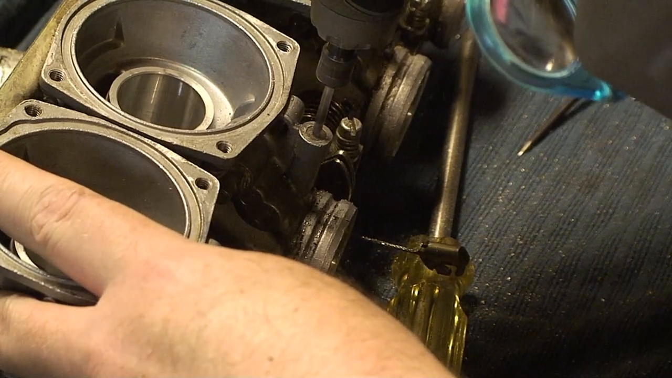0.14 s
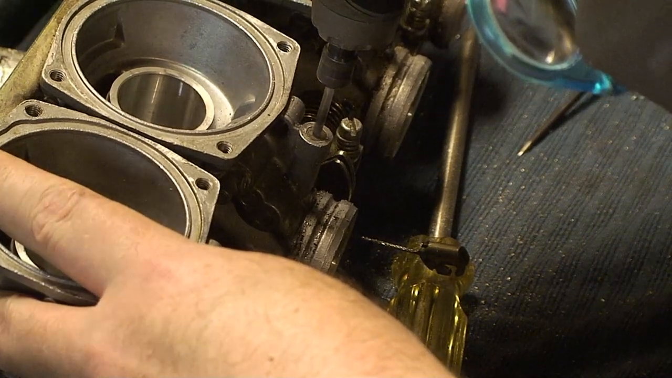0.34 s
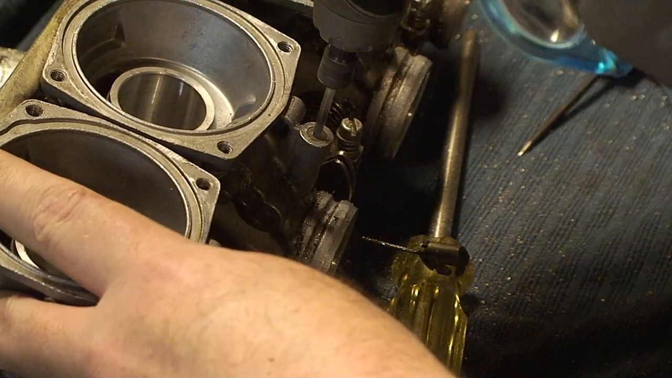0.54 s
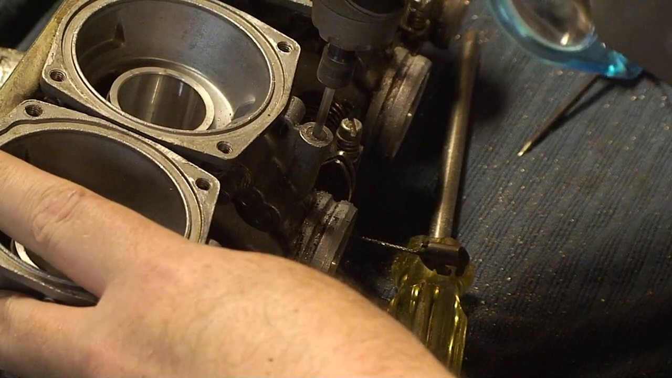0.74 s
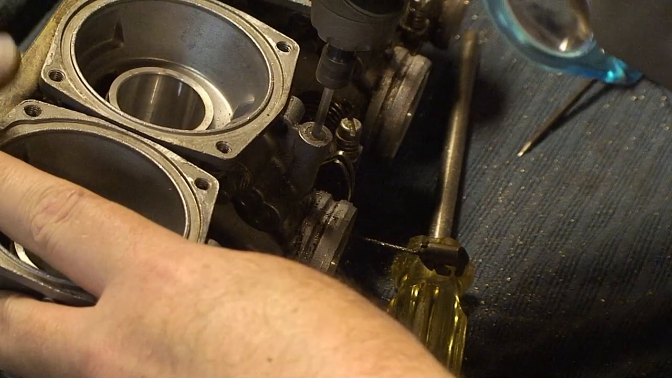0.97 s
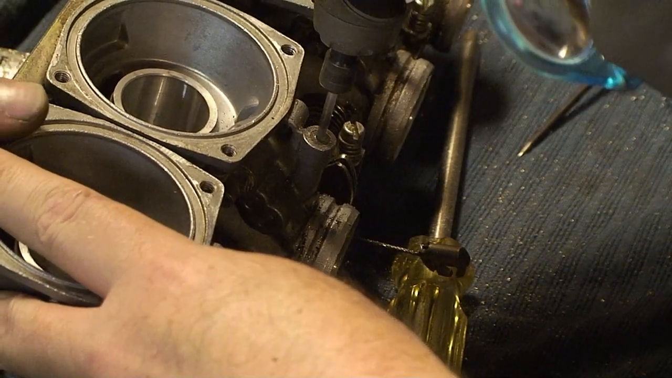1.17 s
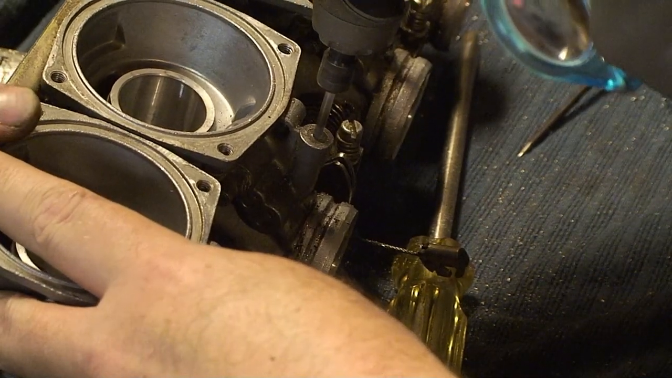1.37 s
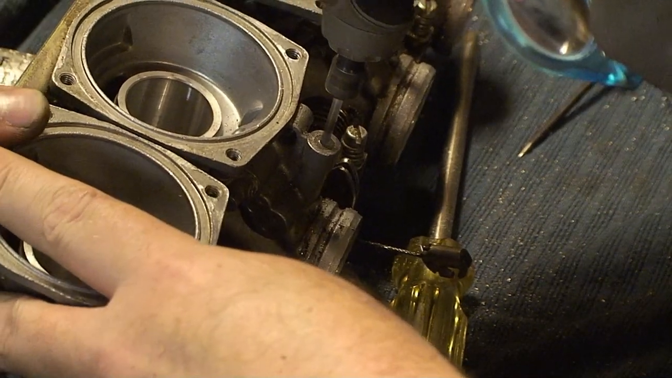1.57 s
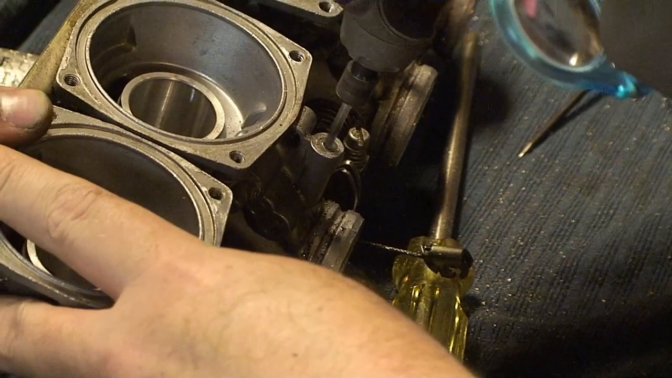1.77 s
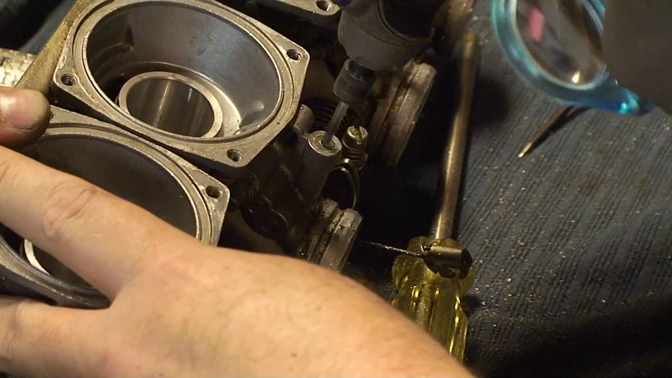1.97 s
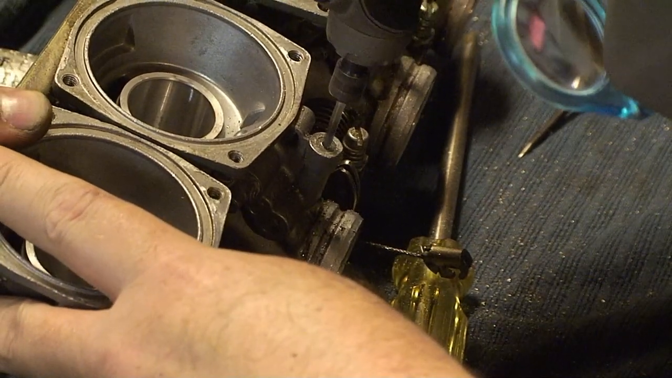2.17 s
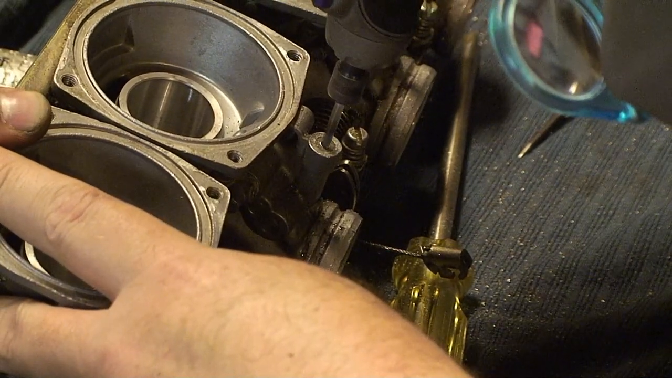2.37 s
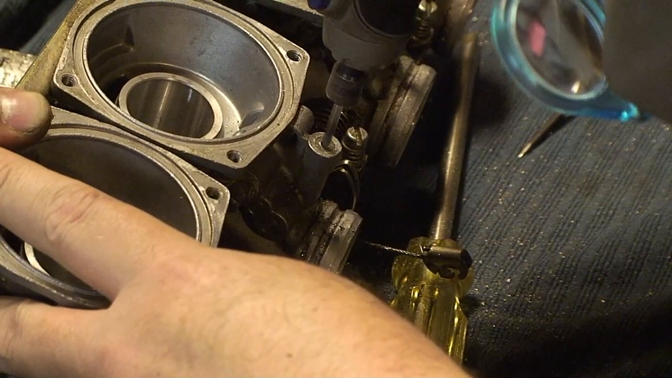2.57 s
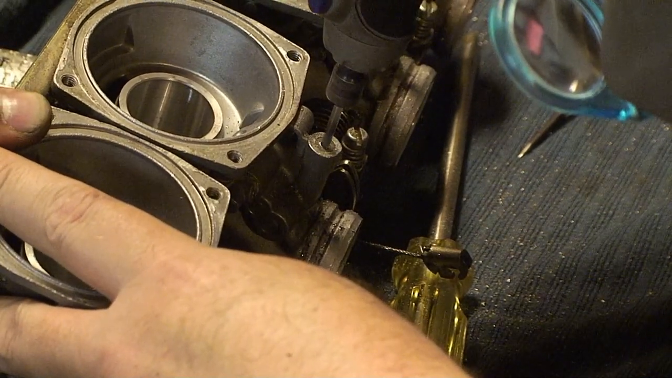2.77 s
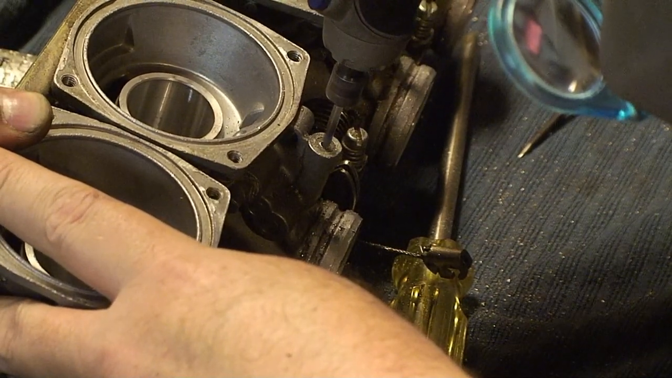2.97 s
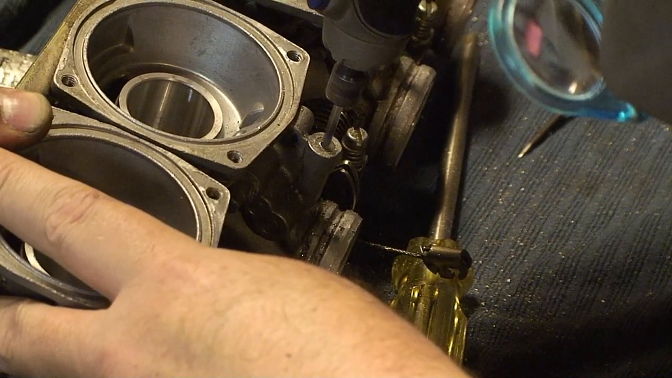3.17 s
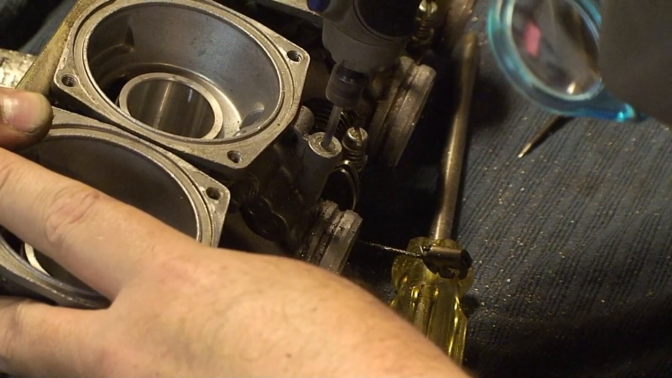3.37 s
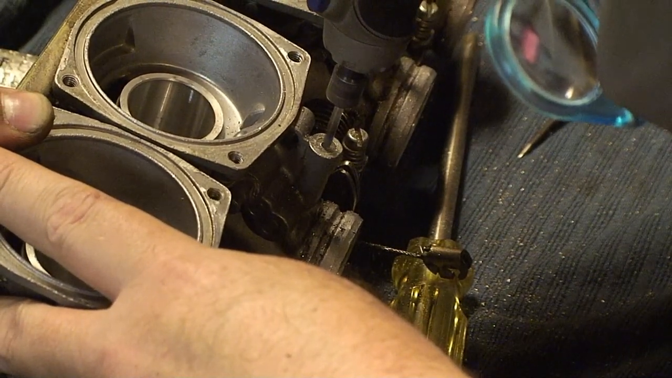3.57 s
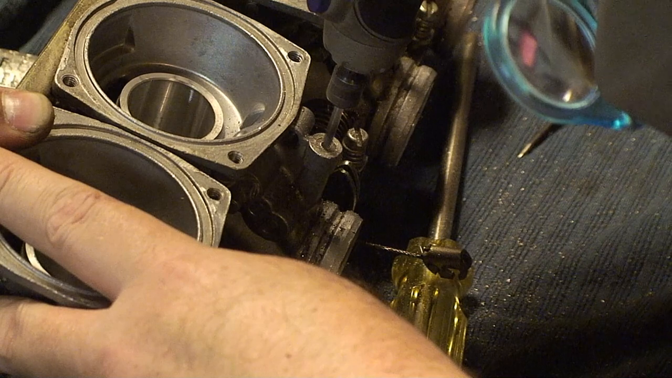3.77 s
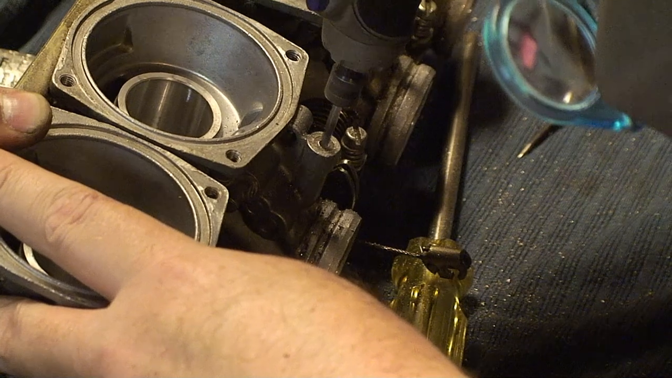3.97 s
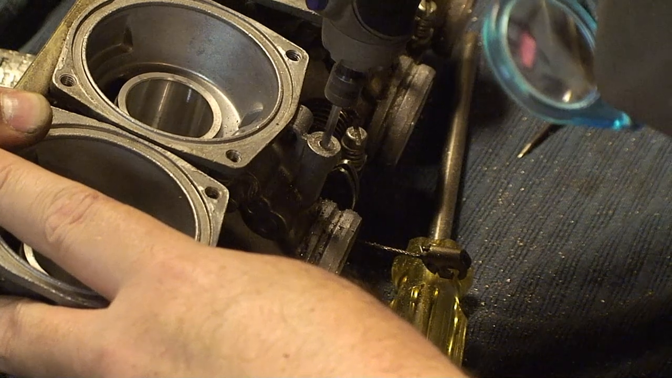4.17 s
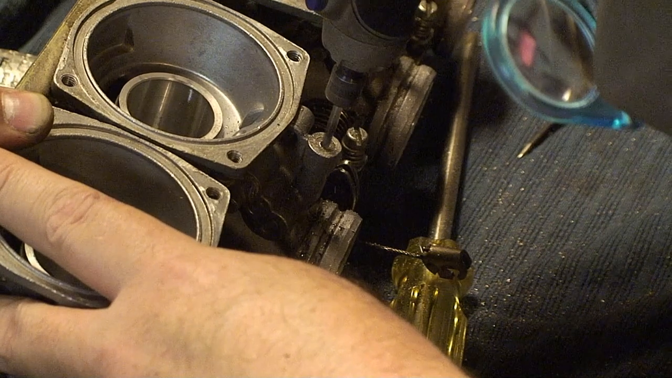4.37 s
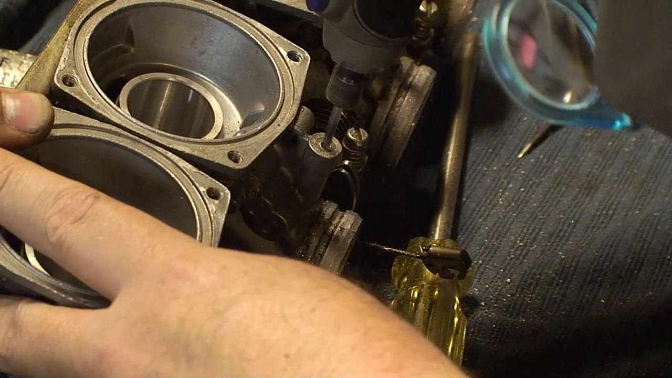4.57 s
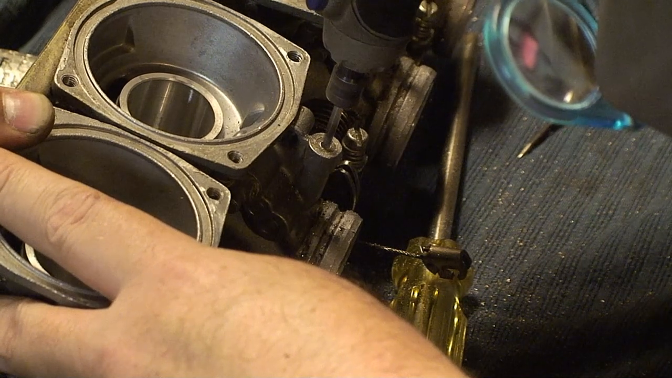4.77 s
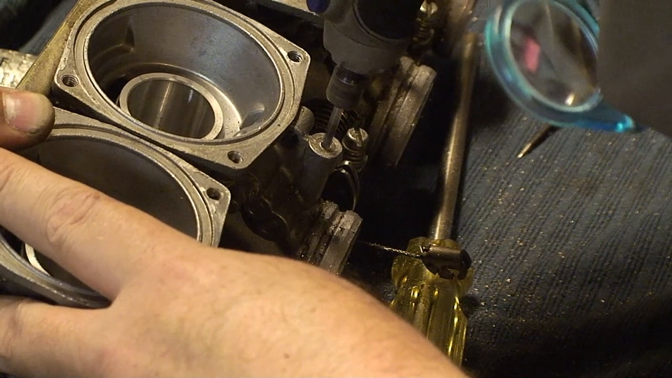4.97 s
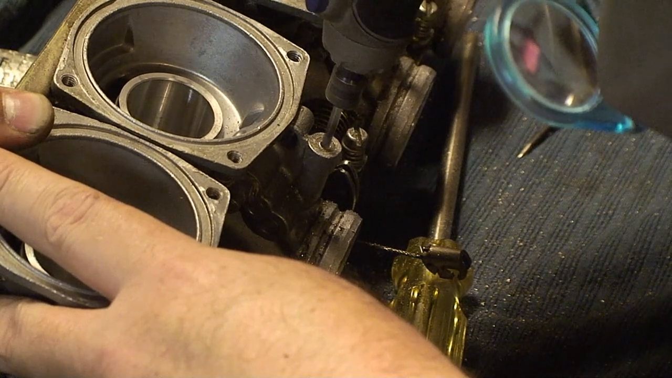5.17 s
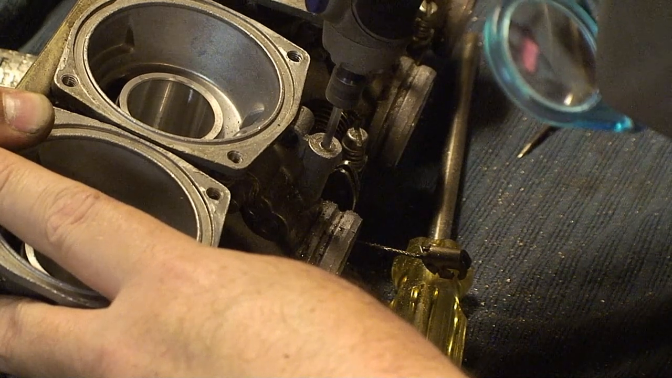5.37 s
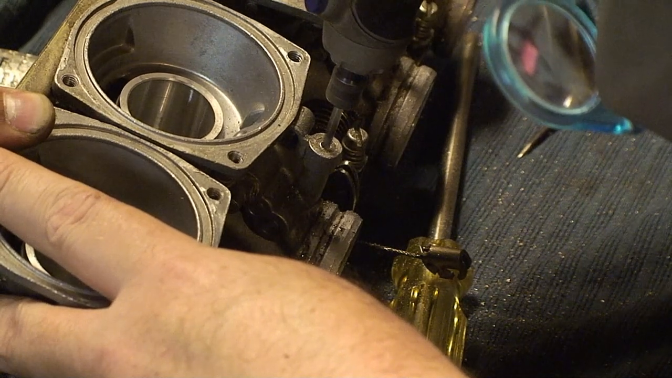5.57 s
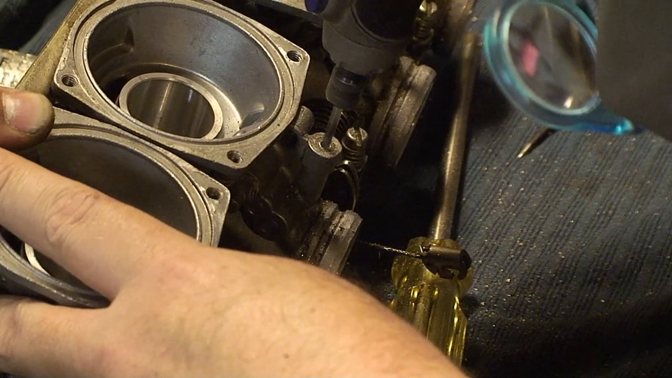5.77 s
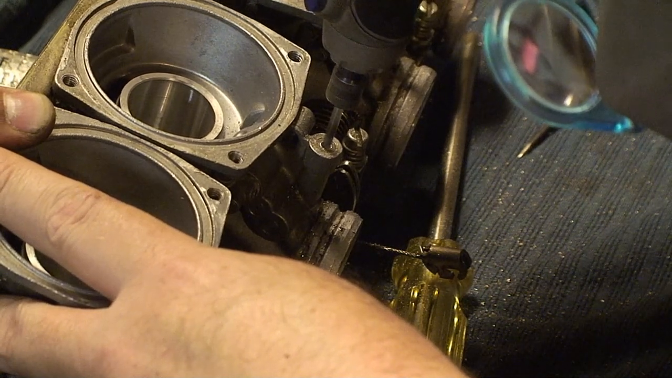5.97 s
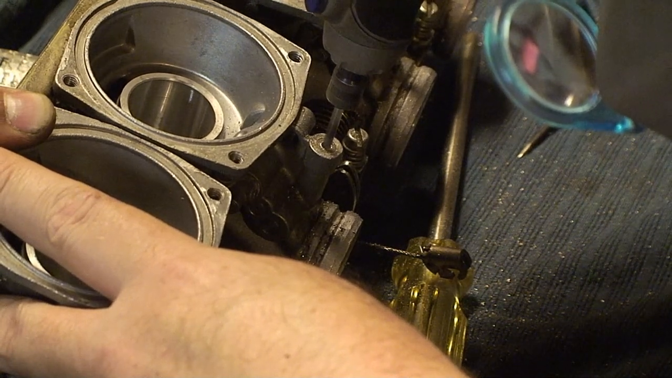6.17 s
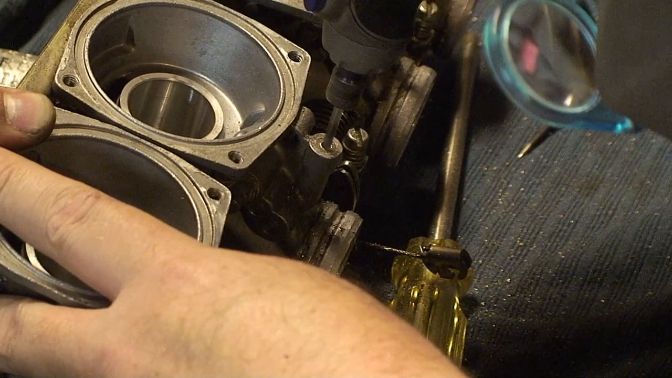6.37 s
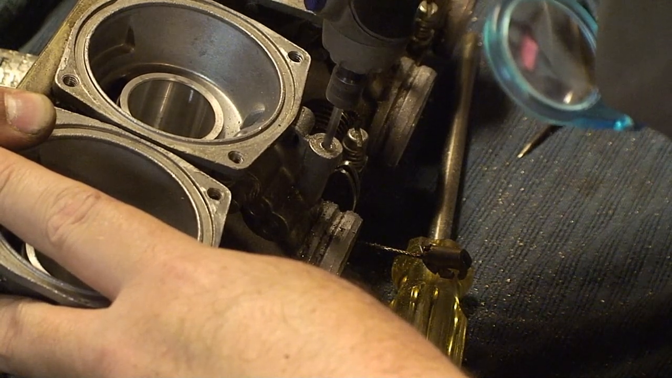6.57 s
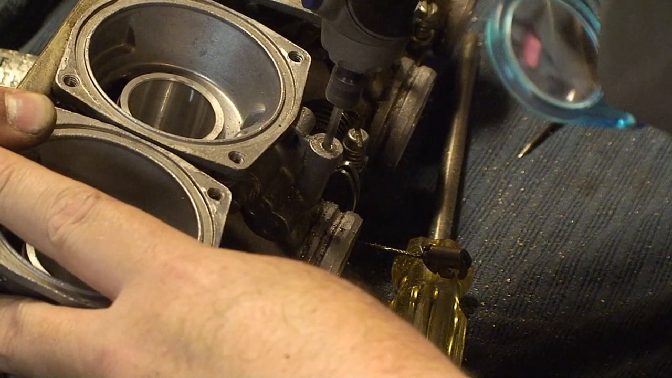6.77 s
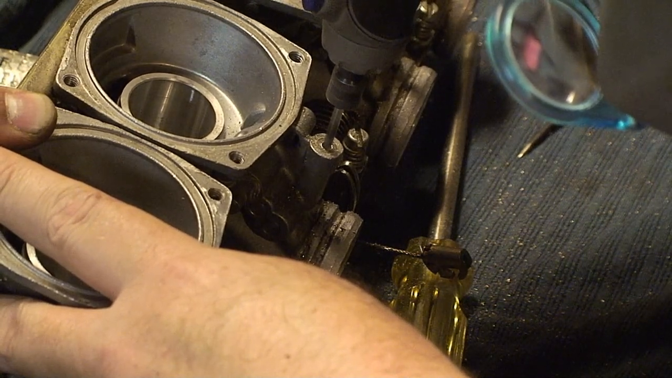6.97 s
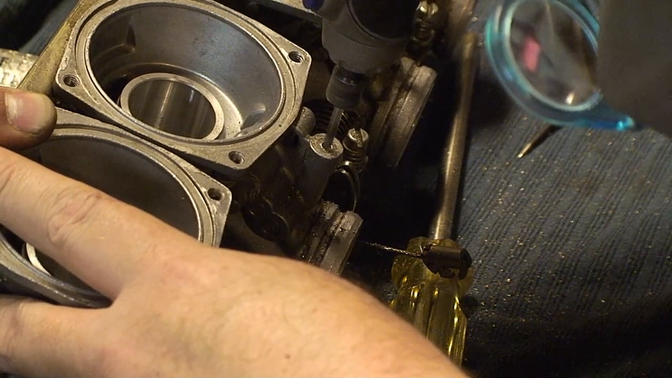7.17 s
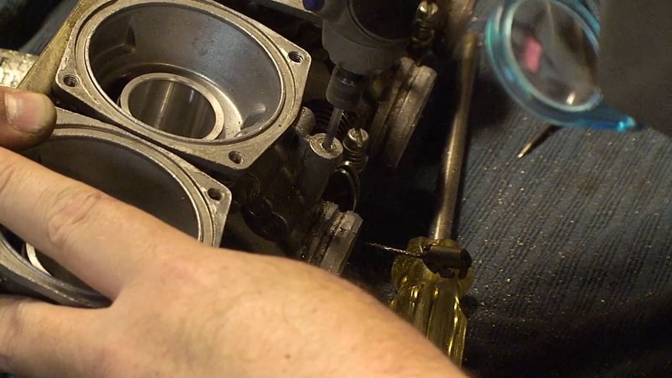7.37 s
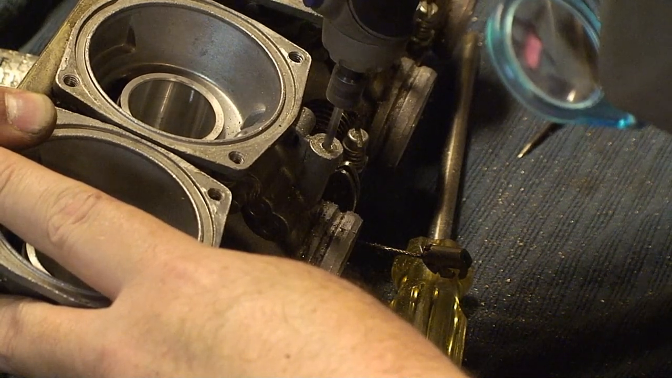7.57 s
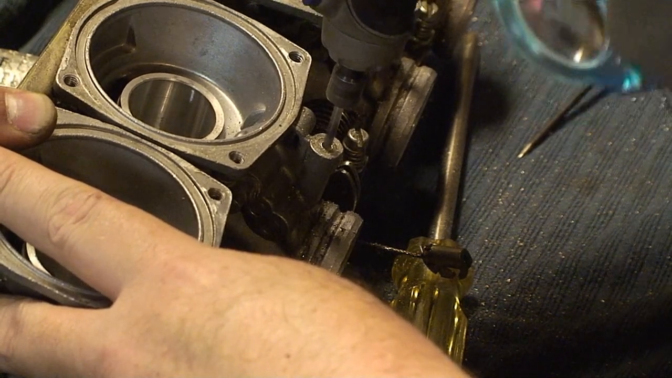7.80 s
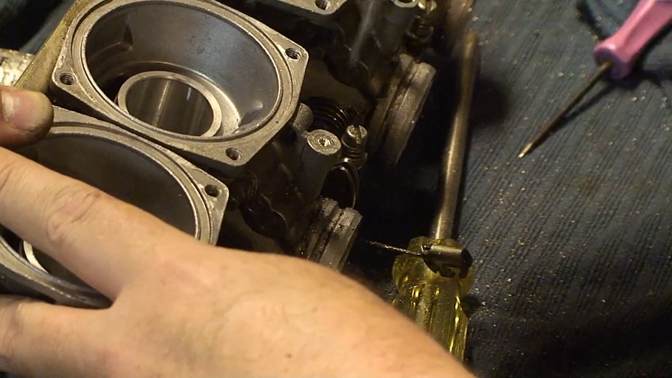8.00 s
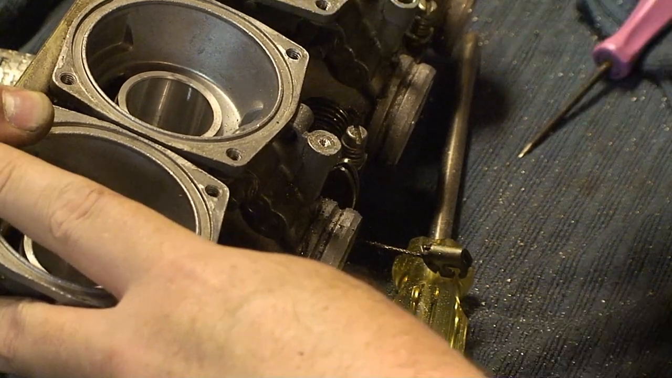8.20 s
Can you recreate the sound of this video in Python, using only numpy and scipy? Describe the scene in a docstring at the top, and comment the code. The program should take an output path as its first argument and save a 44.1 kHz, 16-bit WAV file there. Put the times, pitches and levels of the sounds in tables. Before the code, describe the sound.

A small rotary tool drills into metal close by, a harsh buzzing whine with scraping chatter and growing squeals, then the bit lifts free.

```python
"""On a bench, close to the microphone, a small rotary tool drills into a metal plug in a carburettor.
The two-flute bit scrapes and bites: noise excites resonances and a pattern repeated each turn buzzes.
Tones on multiples of the shaft speed make the chatter and short squeals; catches drag the motor down.
At the end the bit is lifted out and only the motor is left: shaped noise for air, shaft tones for whine."""
import sys
import numpy as np
from scipy import signal
from scipy.fft import rfft, irfft
from scipy.io import wavfile

SR = 44100
rng = np.random.default_rng(int(sys.argv[2]) if len(sys.argv) > 2 else 0)


def persist_wave(psi):
    """Save psi, clipped to +-1, as 16-bit WAV."""
    counts = np.round(np.clip(psi, -1, 1) * 32767).astype(np.int16)
    wavfile.write(sys.argv[1], SR, np.atleast_2d(counts).T)


N = 363384
TIME = np.arange(N) / SR
HZ = np.fft.rfftfreq(N, 1 / SR)

# the bit squeals: middle t/s, length/s, relative level/dB
SQUEAL_BURSTS = [(.89, 0.19, -39.5), (1.278, 0.23, -41), (2.217, 0.15, -56), (2.387, 0.028, -38),
                 (2.733, 0.024, -30), (3.493, 0.074, -32), (4.153, 0.14, -30), (4.334, 0.13, -29),
                 (4.479, 0.17, -26), (4.639, 0.18, -28), (4.804, 0.069, -28), (5.089, 0.2, -29),
                 (5.314, 0.07, -47), (5.369, 0.075, -25), (5.429, 0.047, -31), (5.48, 0.09, -27.5),
                 (5.562, 0.043, -28), (5.777, 0.13, -27), (6.034, 0.11, -28), (6.199, 0.081, -28),
                 (6.33, 0.074, -27), (6.663, 0.069, -27), (6.831, 0.083, -26.5), (6.897, 0.062, -29),
                 (6.965, 0.041, -28), (7.122, 0.029, -25), (7.195, 0.053, -30), (7.4, 0.027, -27.5),
                 (7.517, 0.036, -26), (7.693, 0.059, -26), (7.874, 0.046, -25.5)]
# how hard the bit cuts: t/s, relative flute buzz level/dB, relative chips level/dB
CUTTING_FEED = [(0, -40, -38.5), (1.1, -40, -41.5), (2.06, -46, -42.5), (2.4, -39, -37.5),
                (3.4, -35, -38.5), (4.1, -37.5, -39), (5.9, -36, -38), (6.5, -41.5, -38.5), (7.9, -37, -37)]
# the loose bit skids on the rim: middle t/s, length/s, rattle level/dB, relative wobble level/dB
RIM_SKIDS = [(1.66, 0.14, -49, -56), (1.962, 0.36, -44, -44), (1.975, 0.09, -42, -34), (3.1, .26, -66, -55),
             (7.924, 0.06, -47, -58)]


def buzz(turns, count=64, odd_db=-4, renew_hz=8):
    """Each turn repeats the bumps of the hole, which wear into new ones; two flutes favour even orders."""
    # spectrum of the bumps: f/Hz, relative level/dB
    buzz_colour = [(400, -20.5), (700, -2.5), (1000, 2.5), (1400, 4.5), (1800, 7), (2050, 2), (2380, 2),
                   (2650, 3), (3050, -4), (3600, 4), (4300, 1.5), (5400, -2.5), (6500, 4.5), (7500, -5.5),
                   (9000, -4.5)]
    slip = (0.0012 + 0.0021 * depth()) * drift(36)  # turns; slipping blurs the high orders
    step = np.exp(2j * np.pi * (turns + slip)).astype(np.complex64)
    mean_speed = turns[-1] / TIME[-1]
    wave, out = np.ones(N, np.complex64), np.zeros(N)
    for k in range(1, count):
        wave = wave * step  # the next multiple of the shaft speed
        gain = amp(at_hz(buzz_colour, k * mean_speed) + odd_db * (k % 2))
        out += gain * (wave.real * drift(renew_hz) + wave.imag * drift(renew_hz))
    return unit(out)


def flutes(bumps, sag):
    """The flutes press the bumps out as a buzz that follows the feed and weakens in a catch."""
    loss_db = 0.26  # for each turn per second lost
    return bumps * amp(curve(CUTTING_FEED) - loss_db * sag + 0.49 * drift(39) + 4.0)


def chatter(turns, sag, jolt):
    """The bit and the tool shake in step with the shaft; a catch upsets the pattern."""
    jolt_loss_db = 2.6  # for each turn per second lost
    shake = beats(turns, sag) * flutter(jolt, jolt_loss_db)
    return shake + hum(turns, sag, jolt, jolt_loss_db) + wobble(turns) + knocks(turns) + skid_knock(turns)


def beats(turns, sag):
    """Patterns of six, seven, about ten and other beats a turn, less steady in the deep hole."""
    # six beats a turn: t/s, relative level/dB
    six_level = [(0.0, -41), (0.6, -43), (0.62, -51), (0.88, -39.5), (1.08, -47), (1.28, -40), (1.34, -49),
                 (1.63, -36.5), (1.74, -50), (2.16, -50), (2.39, -34.5), (2.78, -33.5), (3.11, -40),
                 (3.16, -35), (3.31, -34), (3.33, -33), (3.49, -30), (4.02, -40.5), (4.06, -33),
                 (4.22, -34.5), (4.33, -28), (5.03, -36.5), (5.12, -28.5), (5.59, -32), (5.65, -41),
                 (5.83, -29.5), (5.87, -40), (5.99, -28.5), (6.47, -42), (6.98, -28), (7.05, -41),
                 (7.22, -27), (7.27, -38.5), (7.93, -31)]
    # around ten beats a turn: t/s, relative level/dB
    ten_level = [(0, -68), (2.5, -60), (3.12, -43.5), (4.2, -38.5), (5.3, -49), (6.2, -52), (7.9, -62)]
    # tones of each pattern: multiple of the shaft speed, relative level/dB
    six_orders = [(6, 0.5), (12, -7.5), (13, -35), (14, -25)]
    ten_orders = [(9, -2), (10, 2), (11, -25), (16, -2.5)]
    seven_orders = [(7, 0.81), (13, 1.4), (14, -1.5)]
    # a catch breaks the even patterns and feeds the seven-beat one: dB for each turn per second lost
    six_loss_db, ten_loss_db, seven_gain_db = 0.15, 0.5, 1.12
    # seven beats: at the surface, the rise in the deep hole, the fall during a squeal
    surface_db, deep_db, yield_db = -54, 11, 4.5

    slow_slip = (0.0076 + 0.018 * depth()) * drift(14.8)  # turns
    fast_slip = (0.0005 + 0.0013 * depth()) * drift(82)
    shaken = turns + slow_slip + fast_slip
    squealing = np.minimum(bursts([(s, length, 0) for s, length, db in SQUEAL_BURSTS]), 1)
    six_db = curve(six_level) - six_loss_db * sag - .3
    ten_db = curve(ten_level) - ten_loss_db * sag
    seven_db = surface_db + deep_db * depth() + seven_gain_db * sag - yield_db * squealing
    out = bouts(shaken)
    for db, orders in [(six_db, six_orders), (ten_db, ten_orders), (seven_db, seven_orders)]:
        out += amp(db) * lines(shaken, orders, waver_db=1.37 + 0.4 * depth(), waver_hz=6.9)
    return out


def bouts(turns):
    """The bit locks into a pattern of lobes for a while: that multiple of the shaft speed swells and fades."""
    # bouts of chatter: start t/s, length/s, relative level/dB, beats a turn
    chatter_bouts = [(0.078, 0.045, -44, 8), (0.271, 0.059, -33.5, 8), (0.483, 0.1, -32, 8),
                     (0.776, 0.19, -33.5, 8), (1.113, 0.26, -42.5, 8), (1.38, 0.082, -38, 8),
                     (1.643, 0.094, -38, 8), (2.736, 0.23, -32, 8), (3.122, 0.36, -35, 8),
                     (3.463, 0.4, -33, 8), (3.829, 0.36, -31.5, 8), (4.3, 0.6, -39.5, 8),
                     (7.905, .04, -30, 8), (3.067, .11, -33.5, 10), (1.003, 0.11, -44, 7),
                     (5.666, 0.048, -36, 7), (5.87, 0.084, -40.5, 7), (6.737, .06, -41, 7),
                     (0, 0.088, -42, 14), (0.162, 0.13, -47, 14), (0.42, 0.067, -41, 14),
                     (3.389, 0.044, -32, 14)]
    # partials: multiple of the chatter tone (times the beats, rounded), relative level/dB
    overtones = [(1, 1), (1.5, -7.5), (2, -17)]
    # the eight-beat tone between the bouts: t/s, relative level/dB
    eight_level = [(0, -45.5), (1.6, -40.5), (1.8, -56), (2.2, -50), (2.6, -38), (4.4, -60), (5.3, -44),
                   (6.2, -44), (7.9, -52)]
    edge_s, arch_db = 0.03, 4
    out = np.zeros(N)
    for lobes in sorted({round(row[3]) for row in chatter_bouts}):
        gain = amp(curve(eight_level)) * (lobes == 8)
        for s, length, db, beats_a_turn in chatter_bouts:
            if round(beats_a_turn) == lobes:
                off_centre = np.minimum(abs(2 * (TIME - s) / length - 1), 2)
                arch = amp(db + 2.0 - arch_db * off_centre ** 2)
                gain = gain + arch * held(s, length, edge_s)
        orders = [(lobes * k, db) for k, db in overtones]
        out += gain * lines(turns, orders, waver_db=1.75, waver_hz=15)
    return out


def flutter(jolt, jolt_loss_db):
    """Gain of the beats: chips pass under the flutes, and a starting squeal holds the bit still."""
    grips = [(s - 0.36 * length, .035, 0) for s, length, db in SQUEAL_BURSTS]
    gripped = np.minimum(bursts(grips), 1)
    return amp(depth() * drift(41) - 3.1 * depth() * gripped - jolt_loss_db * jolt)


def hum(turns, sag, jolt, jolt_loss_db):
    """Pushed sideways, the tool hums low at two beats a turn; it swells and dips, and drops at each jolt."""
    # t/s, relative level/dB
    hum_level = [(0.0, -61), (0.15, -42), (0.22, -57), (0.35, -38), (0.46, -49), (0.62, -39), (0.64, -51),
                 (0.91, -39.5), (1.5, -48.5), (1.59, -61), (1.66, -48), (2.17, -47.5), (2.21, -58),
                 (2.66, -53), (2.9, -36.5), (3.01, -47), (3.3, -39), (3.45, -48), (3.76, -38), (4.21, -43),
                 (4.27, -54), (4.4, -46), (6.13, -54), (6.53, -47), (6.86, -54), (7.95, -50)]
    offset_db = 0.3  # for each turn per second lost, on top of the level curve
    db = curve(hum_level) + offset_db * sag - jolt_loss_db * jolt - 1.2
    return amp(db) * lines(turns, [(2, 0)], waver_db=1.6, waver_hz=11.0)


def wobble(turns):
    """A steady wobble on the lowest shaft orders, which swings wider in a skid."""
    # multiple of the shaft speed, relative level/dB
    wobble_orders = [(1, -8), (2, -19.5), (3, -13)]
    swing = amp(-63) + bursts([(s, length, wobble_db) for s, length, db, wobble_db in RIM_SKIDS])
    return swing * lines(turns + 0.0074 * drift(25), wobble_orders, waver_db=3.5, waver_hz=38)


def knocks(turns):
    """Low knocks on the shaft orders: mainly four beats a turn with some of three, and five beats a turn."""
    # four beats: t/s, relative level/dB
    four_level = [(0, -51), (.9, -40), (1.35, -44.5), (1.6, -39.5), (2.15, -40), (2.3, -60), (3.1, -43.5),
                  (3.8, -49.5), (5, -57.5), (7.9, -58)]
    # five beats: t/s, relative level/dB
    five_level = [(0, -52), (1.45, -42), (1.7, -49), (2.3, -38), (2.45, -34.5), (2.9, -29.5), (3.15, -57),
                  (3.55, -38), (3.9, -65), (4.4, -34.5), (4.9, -53), (7.72, -57.5), (7.86, -40),
                  (7.95, -26)]
    # tones of the four-beat knock: multiple of the shaft speed, relative level/dB
    four_orders = [(3, -15.5), (4, -3)]
    four = amp(curve(four_level) - 4.5) * lines(turns, four_orders, waver_db=3.5, waver_hz=20.0)
    five = amp(curve(five_level) - 10.5) * lines(turns, [(5, 0)], waver_db=4.0, waver_hz=8.2)
    return four + five


def skid_knock(turns):
    """A skidding bit knocks on several shaft orders, loosely in step."""
    # multiple of the shaft speed, relative level/dB
    skid_orders = [(3, -0.5), (4, -16), (5, 0.5), (7, -9), (8, 3), (9, 0)]
    loose = turns + 0.035 * drift(19)
    return amp(-1) * skidding() * lines(loose, skid_orders, waver_db=3.5, waver_hz=32)


def squeal(turns, speed):
    """Stick and slip at twelve beats a turn; deep down each squeal starts flat and raspy, then locks on."""
    # the tone: multiple of the shaft speed, relative level/dB
    squeal_orders = [(12, 2), (13, -19), (14, -16.5)]
    # its overtones: multiple of the shaft speed, relative level/dB
    rasp_orders = [(18, -1.5), (24, -5.5), (30, -15), (36, -12.5)]
    grabs = [(s - 0.29 * length, .032, db) for s, length, db in SQUEAL_BURSTS]
    flat = .017 * depth() * bursts([(s - .008, length, 0) for s, length, db in grabs])  # share of speed
    slipping = turns - np.cumsum(flat * speed) / SR + (0.0015 + 0.005 * depth()) * drift(38)
    uneven = (0.001 + 0.007 * depth()) * drift(170)  # turns

    # a softer tone links the squeals
    singing = bursts([(s + 0.33 * length, length + 0.14, db - 12.5) for s, length, db in SQUEAL_BURSTS])
    tone_gain = np.hypot(bursts(SQUEAL_BURSTS), singing)
    tone = tone_gain * lines(slipping + 0.45 * uneven, squeal_orders, waver_db=2.1, waver_hz=40)

    # uneven slips smear the overtones
    rasp = lines(slipping + uneven, rasp_orders, waver_db=2.5, waver_hz=90)
    rasp_gain = amp(-12.0) * bursts(SQUEAL_BURSTS) + amp(-21.5 + 10.7 * depth()) * bursts(grabs)
    return tone + rasp * rasp_gain


def screech(turns, bumps):
    """The tip rubs as each flute passes: a broad grit, and a ring of the bit that shifts with the contact."""
    # the tip screeches, mostly in the first three seconds, with a few later rings:
    # middle t/s, length/s, relative level/dB, ringing f/Hz
    screeches = [(0.03, .14, -32.5, 5190), (0.2, 0.13, -32.5, 5540), (0.415, 0.17, -32.2, 5660),
                 (0.61, 0.063, -35, 6040), (0.708, 0.11, -33.5, 5220), (0.794, 0.1, -34, 6040),
                 (1.134, 0.36, -32.5, 6000), (1.396, 0.4, -39.5, 3792), (1.569, 0.26, -37, 4470),
                 (1.75, 0.12, -39, 4020), (2.227, 0.2, -32, 4670), (2.433, 0.3, -34.5, 4525),
                 (2.488, 0.32, -34, 6240), (2.648, 0.18, -40, 4580), (2.827, 0.31, -38.5, 3700),
                 (3.05, 0.26, -36, 4230), (4.238, 0.19, -45, 6443), (4.896, 0.068, -42, 6200),
                 (5.454, 0.46, -49, 6700), (6.353, 0.61, -48.5, 6594), (7.048, 0.049, -34, 4468)]
    repeat = 2.2  # strength of the part that repeats every turn, against the noise
    rub = .5 + strokes(turns, sharpness=6.4, second=0.88)
    drive = (rng.standard_normal(N) + repeat * bumps) * rub * amp(0.3 * drift(115))
    grit = resonate(drive, 5340, width_hz=2200) + amp(-19.0) * resonate(drive, 11830, width_hz=370)
    out = np.zeros(N)
    for s, length, db, hz in screeches:
        width_hz = .16 * hz
        ring = resonate(drive, hz, width_hz) + amp(-6.5) * resonate(drive, 2 * hz, width_hz)
        out += (amp(-1.5) * ring + amp(-2.5) * grit) * bursts([(s, length, db)])
    return out


def grind(turns, sag):
    """Chips crunch under the flutes and ring the metal; a skid sets the whole body rattling."""
    # the metal rings under the cut: f/Hz, width/Hz, relative level/dB
    metal_rings = [(4010, 980, -6), (6170, 250, -34), (6035, 320, 3.5), (6700, 680, 3.5), (11700, 590, -12)]
    # spectrum of the crunch: f/Hz, relative level/dB
    chips_colour = [(30, -34), (100, -29), (220, -18.5), (500, -40), (900, -2.5), (1800, 0), (3000, -5),
                    (3900, 0), (5400, 3.5), (6500, 3.5), (7500, -1), (12000, 0.5), (13500, -6.5),
                    (14200, -91)]
    # spectrum of the rattle: f/Hz, relative level/dB
    rattle_colour = [(40, -33), (140, 0), (500, -11), (800, 11), (1200, 16), (1450, -17), (1900, 17),
                     (3000, -24), (6000, -43)]
    crunch = rng.standard_normal(N) * (1.8 + strokes(turns, sharpness=3.2, second=0.27)) * amp(drift(180))
    ring = unit(sum(amp(db + 5.2 * drift(2.0)) * resonate(crunch, hz, width)
                    for hz, width, db in metal_rings))
    ring_share = amp(-2.5) * np.interp(TIME, [2.1, 2.5, 5], [.4, .8, 1])
    unsteady = amp(.9 * drift(15))
    touch = amp(curve(CUTTING_FEED, axis=2) - 0.25 * sag + 3.5) * unsteady
    chips = (colour(crunch, chips_colour) + ring * ring_share) * touch
    hits = rng.standard_normal(N) * (0.54 + strokes(turns, sharpness=4.4, second=0.44))
    return chips + colour(hits, rattle_colour) * skidding()


def motor(turns):
    """Cooling air as shaped noise; fan and brushes whine, and the free motor whistles, on shaft orders."""
    # spectrum of the air: f/Hz, relative level/dB
    air_colour = [(71, -55), (120, -31), (332, -9), (432, -11), (519, -15), (575, -14.5), (2110, -9),
                  (2440, -3), (3110, -10), (5840, -9), (7300, -0.5), (7920, -4), (15500, -24)]
    # whine: multiple of the shaft speed, relative level/dB
    whine_orders = [(16, -10.5), (32, -8.5), (47, -1), (48, -8), (49, -15.5)]
    # whistles at sixteen beats a turn: middle t/s, length/s, level/dB
    whistle_bursts = [(8.082, .06, -50), (8.19, 0.052, -55)]
    air = amp(-43) * colour(rng.standard_normal(N), air_colour)
    whistle = bursts(whistle_bursts) * lines(turns, [(16, 0.0011)], waver_db=2.0, waver_hz=20)
    whine = amp(-57.5) * lines(turns + 0.0016 * drift(45), whine_orders, waver_db=9.5, waver_hz=5.1)
    return air + whistle + whine


def cavity(x, from_hz=3200, count=4):
    """The treble bounces in the bores of the body; its fine peaks shift as the tool and the hand move."""
    t60, shift_hz = .04, .6  # decay s, base rate of the shift
    t = np.arange(SR // 20) / SR
    treble = signal.sosfilt(signal.butter(3, from_hz, "high", fs=SR, output="sos"), x)
    out = np.zeros(N)
    for k in range(count):
        tail = rng.standard_normal(len(t)) * amp(-60 * t / t60)
        cycles = shift_hz * (1 + k / count) * TIME + k / count
        share = np.sqrt(2 / count) * np.cos(np.pi * cycles)
        out += signal.oaconvolve(treble * share, tail / np.linalg.norm(tail))[:N]
    return x + amp(-9.5) * out


def bench(x, t60=0.48):
    """Spectrum of short, dense reflections from the bench and the metal body, drawn anew at each call."""
    # f/Hz, gain/dB
    echo_colour = [(100, 4), (250, -3.5), (1000, -8), (5000, -14.5), (8500, -9), (12000, -8.5)]
    t = np.arange(SR // 6) / SR
    tail = rng.standard_normal(len(t)) * amp(-60 * t / t60)
    echo = signal.fftconvolve(x, tail / np.linalg.norm(tail))[:N]
    return rfft(echo) * amp(at_hz(echo_colour, HZ))


def depth():
    """How far the bit has sunk into the deep hole, 0-1."""
    return np.interp(TIME, [4.5, 7.4], [0, 1])


def contact():
    """Gain of the cutting: full until the bit leaves the hole, then it dies away."""
    lift_s, lift_db_per_s = 7.915, 207
    return amp(-lift_db_per_s * np.maximum(TIME - lift_s, 0))


def skidding():
    """Gain of the rattle of the skids."""
    return bursts([(s, length, db) for s, length, db, wobble_db in RIM_SKIDS])


def caught(s, fade_s):
    """0-1: a flute digs in at s, a quick rise that dies away."""
    rise_s = .012
    since = np.maximum(TIME - s, 0)
    return np.minimum(since / rise_s, 1) * np.exp(-np.minimum(since / fade_s, 20))


def strokes(turns, sharpness, second):
    """Contact of the two flutes in each turn; the second one presses less."""
    angle = np.cos(2 * np.pi * turns)
    return np.exp(sharpness * (angle - 1)) + second * np.exp(sharpness * (-angle - 1))


def lines(turns, orders, waver_db, waver_hz):
    """Tones locked to whole multiples of the shaft speed, each wavering in strength."""
    out = np.zeros(N)
    for k, db in orders:
        gain = amp(db + waver_db * drift(waver_hz))
        out += gain * np.sin(2 * np.pi * (round(k) * turns + rng.random()))
    return np.sqrt(2) * out


def resonate(x, hz, width_hz):
    """A steep resonance of rms 1."""
    band = [hz - width_hz / 2, hz + width_hz / 2]
    return unit(signal.sosfilt(signal.butter(2, band, "band", fs=SR, output="sos"), x))


def colour(x, points):
    """Filters x by a spectrum, at rms 1."""
    return unit(irfft(rfft(x) * amp(at_hz(points, HZ)), N))


def bursts(rows):
    """Gain of rounded bursts, each about 9 dB down at the ends of its length."""
    t = TIME[::32]
    power = sum(amp(db) ** 2 * np.exp(-2 * abs(2 * (t - s) / length) ** 3) for s, length, db in rows)
    return np.interp(TIME, t, np.sqrt(power))


def held(start, length, edge_s):
    """0-1: on from start for length, with sloping edges."""
    return np.clip(np.minimum(TIME - start, start + length - TIME) / edge_s + .5, 0, 1)


def drift(rate_hz):
    """Smooth random curve of rms 1; its low-pass falls off above about rate_hz."""
    coarse = rng.standard_normal(8192)
    f = np.fft.rfftfreq(len(coarse), N / SR / len(coarse))
    smooth = irfft(rfft(coarse) / (1 + (f / rate_hz) ** 2))
    return np.interp(TIME, np.linspace(0, N / SR, len(smooth)), unit(smooth))


def curve(rows, axis=1):
    """One column of a time table, at every sample."""
    columns = np.transpose(rows)
    return np.interp(TIME, columns[0], columns[axis])


def at_hz(points, hz):
    """Reads a spectrum on a log-frequency axis."""
    f, value = np.transpose(points)
    return np.interp(np.log(hz + 1), np.log(f + 1), value)


def unit(x):
    """Scales to rms 1."""
    return x / np.sqrt(np.mean(x ** 2) + 1e-20)


def amp(db):
    """Decibels to gain."""
    return 10 ** (np.asarray(db) / 20)


def stereo(tool):
    """Left and right differ in level, phase and reflections; the low tones lean to the left."""
    # f/Hz, left minus right/dB
    side_levels = [(60, 5), (200, 3.5), (780, 4.5), (880, 5), (1150, 0.5), (2400, 0.5), (4400, -1.3),
                   (8000, -1), (15000, -0.5)]
    # f/Hz, phase by which left leads/rad
    side_leads = [(100, -0.32), (950, 0.21), (3000, -0.057), (15000, -0.27)]
    lean = amp(at_hz(side_levels, HZ) / 2) * np.exp(.5j * at_hz(side_leads, HZ))
    ports = np.array([lean, 1 / lean]) / abs((lean + 1 / lean) / 2)
    return np.array([irfft(port * (rfft(tool) + bench(tool)), N) for port in ports])


def scene():
    """All layers follow one shaft, which each catch jolts and slows down."""
    # a flute catches: t/s, speed drop before rise and decay/(turns/s), decay time constant/s
    catches = [(0.088, 3.25, 0.029), (0.627, 5.1, 0.054), (1.64, 2.9, 0.061), (1.921, 5.5, 0.1),
               (2.544, 3.5, 0.14), (2.966, 11, 0.1), (3.012, 5.1, 0.043), (3.402, 7.3, 0.083),
               (4.215, 5.3, 0.08), (4.83, 11.2, 0.17), (5.591, 7.25, 0.11), (5.835, 5.4, 0.053),
               (6.402, 4.64, 0.14), (6.47, 4.9, .08), (6.693, 6.7, 0.06), (7.0, 7.9, 0.089),
               (7.254, 6.9, 0.095), (7.331, 5, 0.069), (7.607, 5.5, 0.072), (7.758, 7.4, 0.11)]
    # motor speed under the changing push of the hand, without the catches: t/s, speed/(turns/s)
    motor_speed = [(0, 150), (.1, 150), (.16, 153), (.3, 148), (.39, 153.4), (.52, 146), (.62, 152.5),
                   (.75, 151.8), (.85, 148.8), (.96, 150), (1.04, 153), (1.2, 147.8), (1.35, 151.5),
                   (1.41, 148.3), (1.52, 153.5), (1.61, 151), (1.68, 147.5), (1.78, 154.5), (2.27, 154.8),
                   (2.36, 150.6), (2.88, 149.6), (3.3, 148.8), (3.7, 147.2), (4.7, 146.5), (5.2, 145.6),
                   (6.05, 143.8), (6.3, 141), (6.6, 140.3), (6.85, 145.8), (7.2, 144.8), (7.45, 140.5),
                   (7.75, 142.5), (7.85, 139), (7.93, 142), (7.98, 145), (8.04, 152), (8.08, 148.8),
                   (8.13, 154), (8.2, 151), (8.24, 153)]
    jolt_s, jolt_slip = 0.012, 0.0039  # decay; turns of slip for each turn per second lost
    sag = sum(lost * caught(s, recovery) for s, lost, recovery in catches)
    jolt = sum(lost * caught(s, jolt_s) for s, lost, recovery in catches)
    speed = curve(motor_speed) - sag
    turns = np.cumsum(speed * (1 + 0.00184 * drift(24.8))) / SR
    bit = turns + jolt_slip * jolt * drift(87)  # the jolt twists the bit against the shaft

    bumps = buzz(bit)
    cutting = flutes(bumps, sag) + chatter(bit, sag, jolt) + squeal(bit, speed)
    cutting = cutting + screech(bit, bumps) + grind(turns, sag)
    return stereo(cavity(cutting * contact() + motor(turns)))


def record(dry):
    """The microphone sheds the deep bass; then a low-pass limits the band."""
    low_cut_hz, edge_hz = 90, 15700
    thin = signal.sosfilt(signal.butter(3, low_cut_hz, "high", fs=SR, output="sos"), dry)
    low_pass = signal.firwin(801, edge_hz, window=("kaiser", 9), fs=SR)
    return signal.oaconvolve(thin, low_pass[None], "same")


dry = scene()
out = record(dry)
persist_wave(out)
```